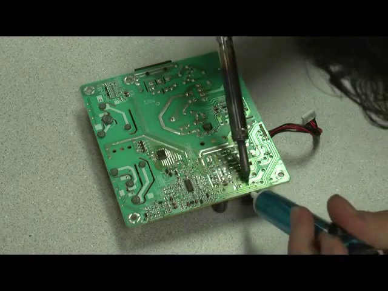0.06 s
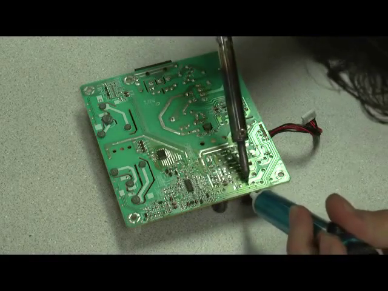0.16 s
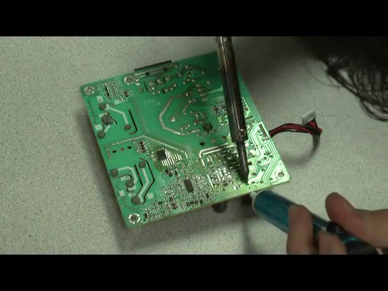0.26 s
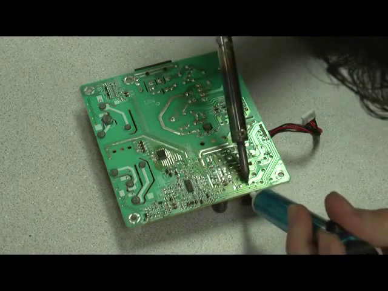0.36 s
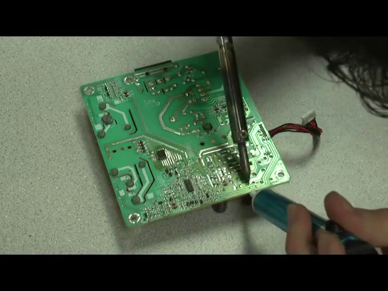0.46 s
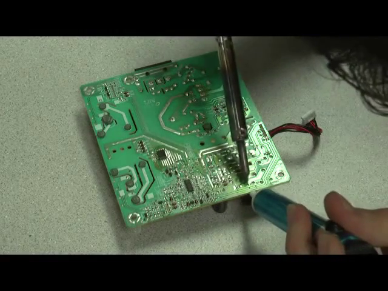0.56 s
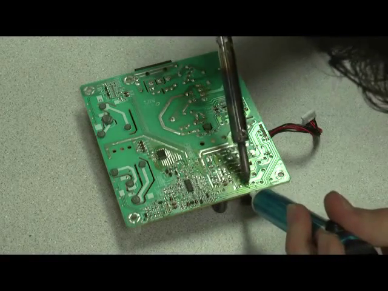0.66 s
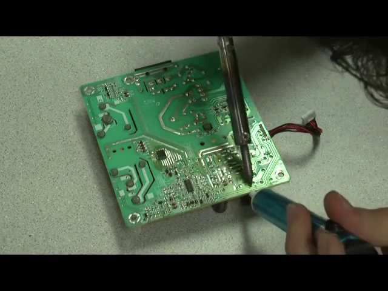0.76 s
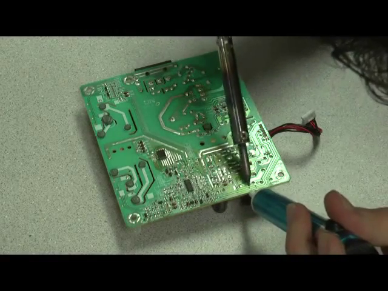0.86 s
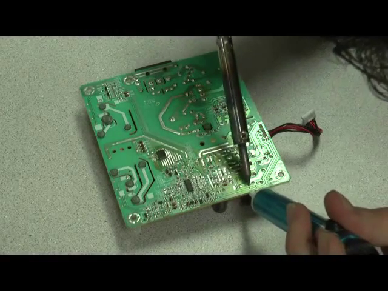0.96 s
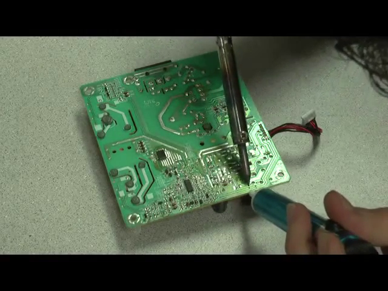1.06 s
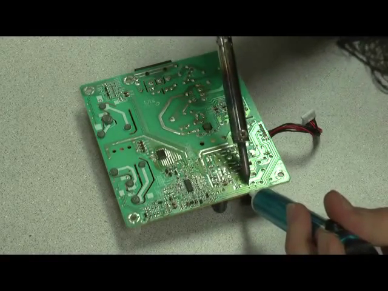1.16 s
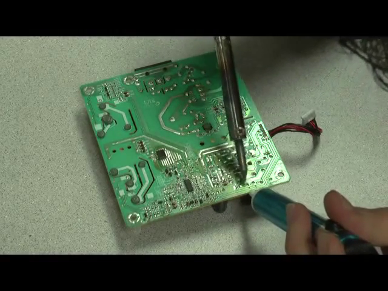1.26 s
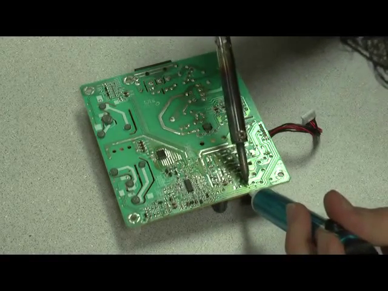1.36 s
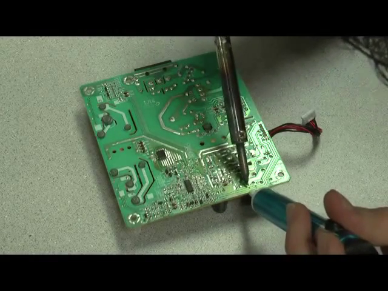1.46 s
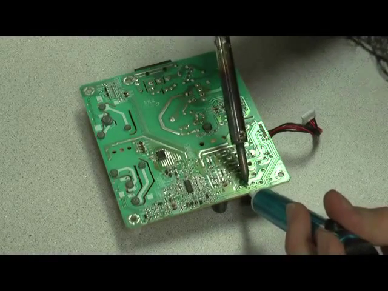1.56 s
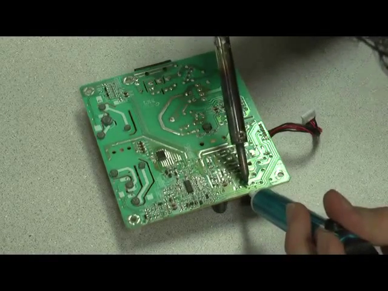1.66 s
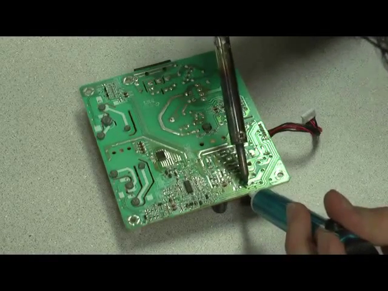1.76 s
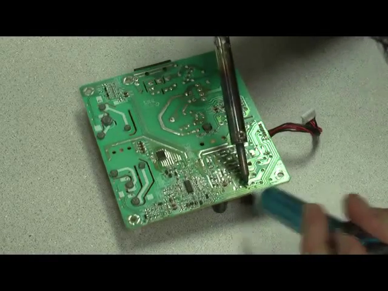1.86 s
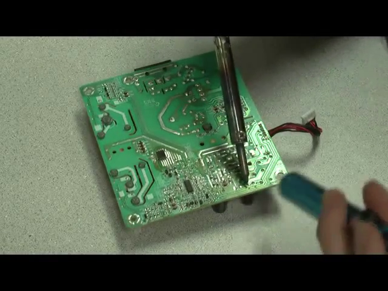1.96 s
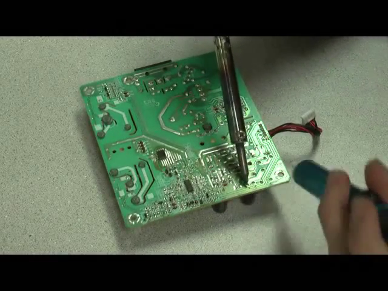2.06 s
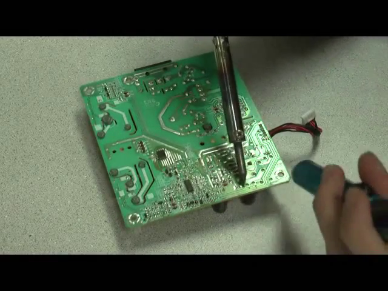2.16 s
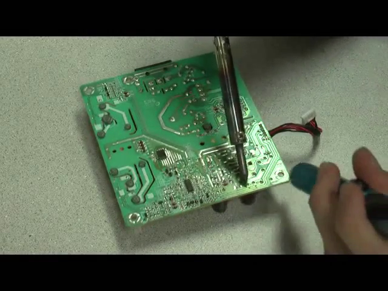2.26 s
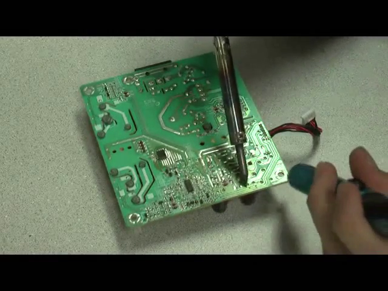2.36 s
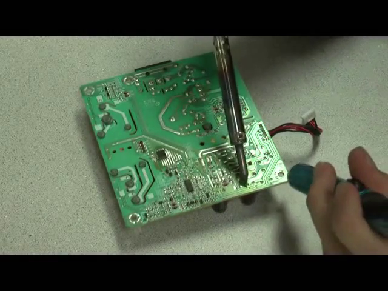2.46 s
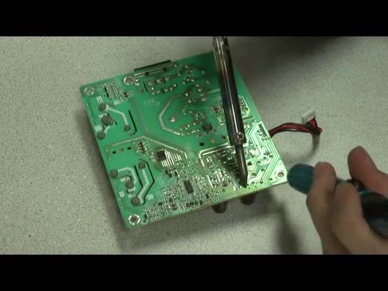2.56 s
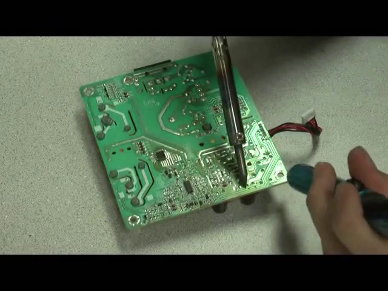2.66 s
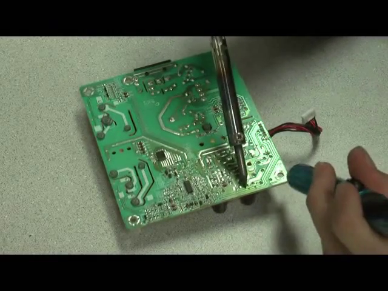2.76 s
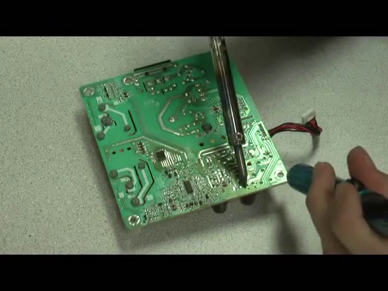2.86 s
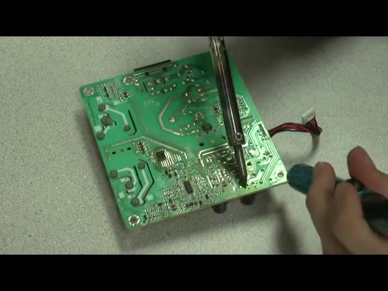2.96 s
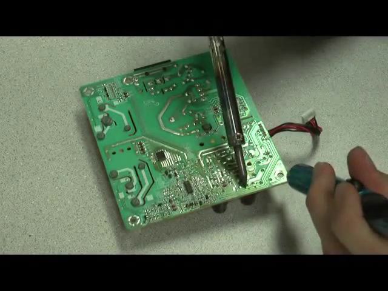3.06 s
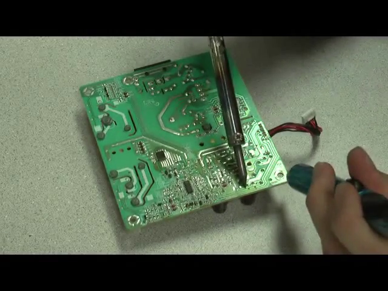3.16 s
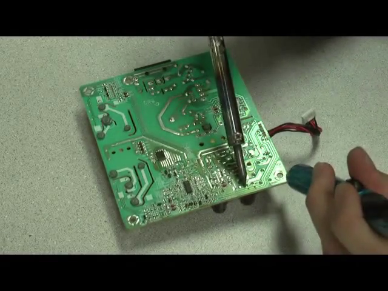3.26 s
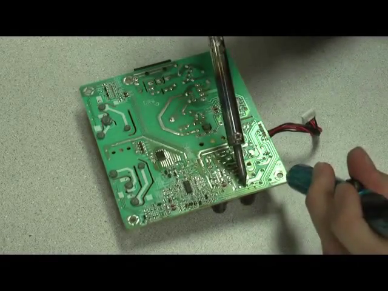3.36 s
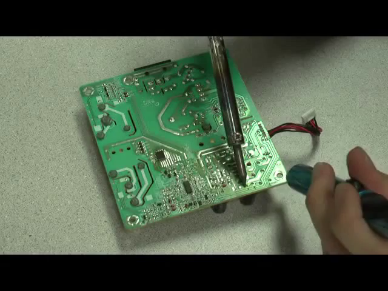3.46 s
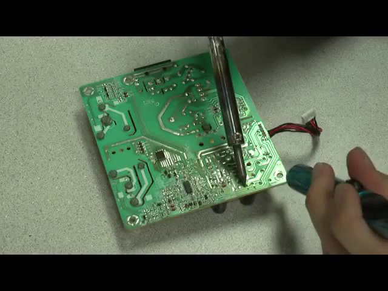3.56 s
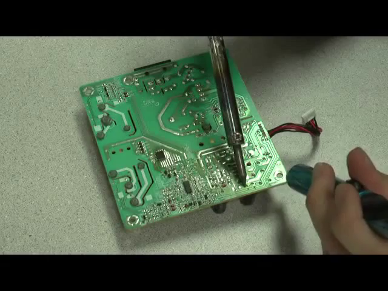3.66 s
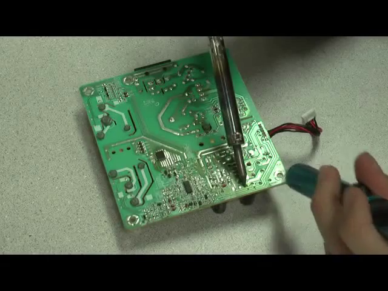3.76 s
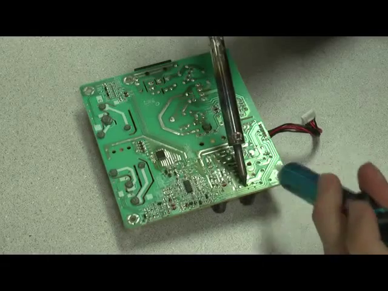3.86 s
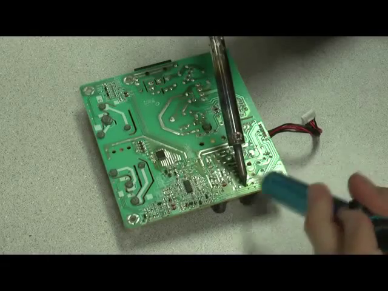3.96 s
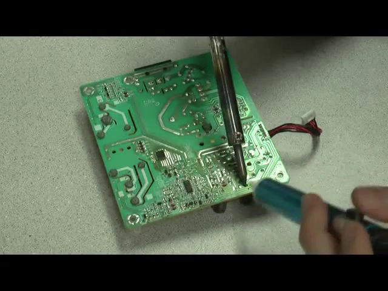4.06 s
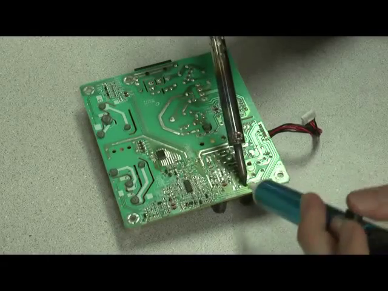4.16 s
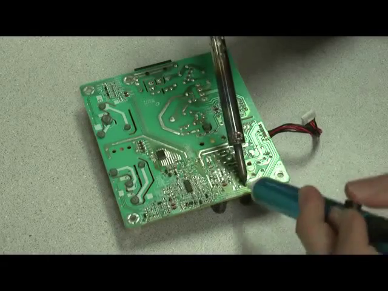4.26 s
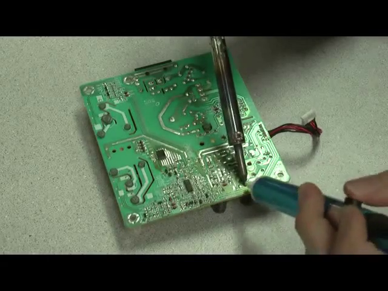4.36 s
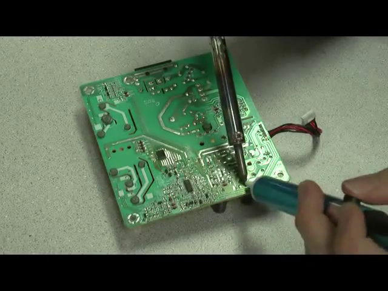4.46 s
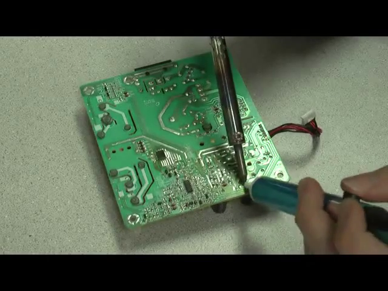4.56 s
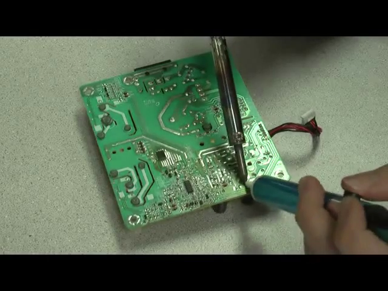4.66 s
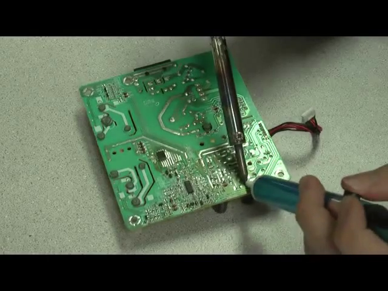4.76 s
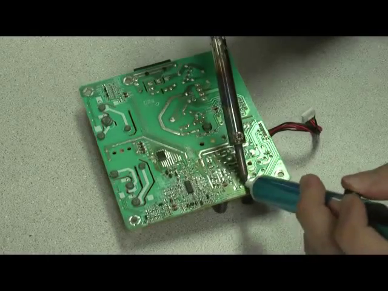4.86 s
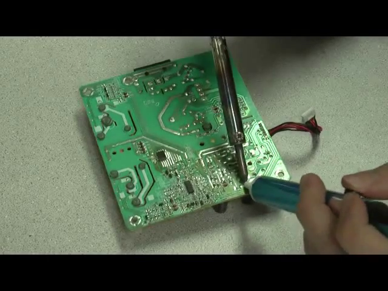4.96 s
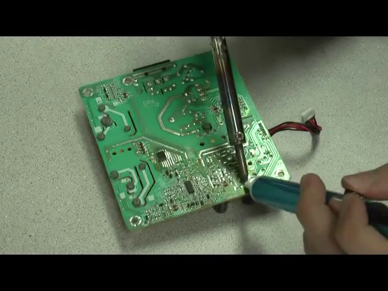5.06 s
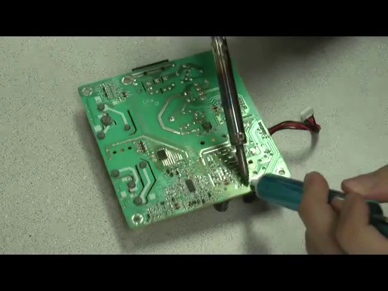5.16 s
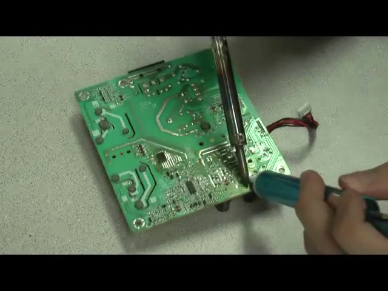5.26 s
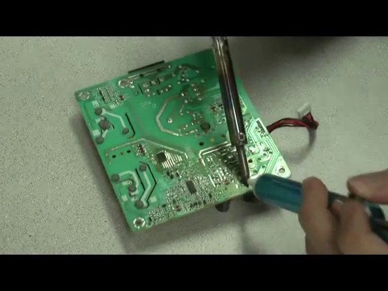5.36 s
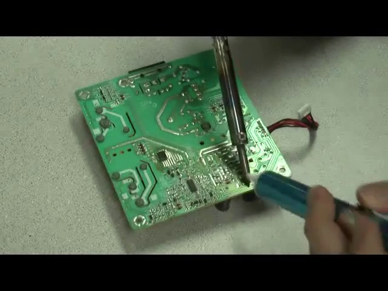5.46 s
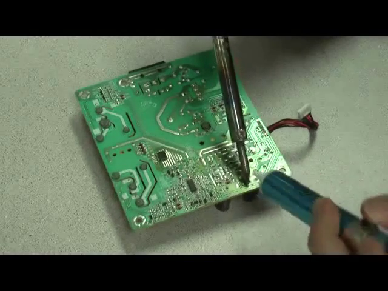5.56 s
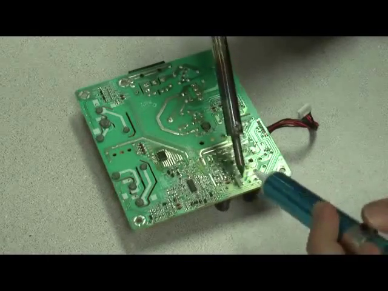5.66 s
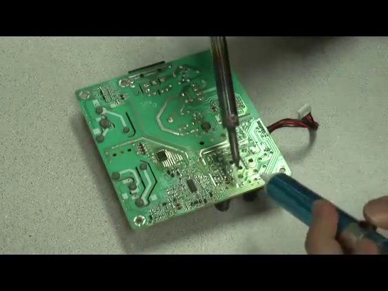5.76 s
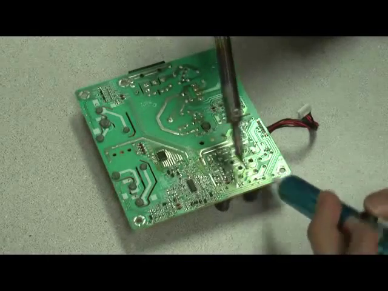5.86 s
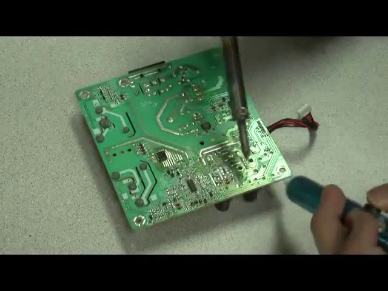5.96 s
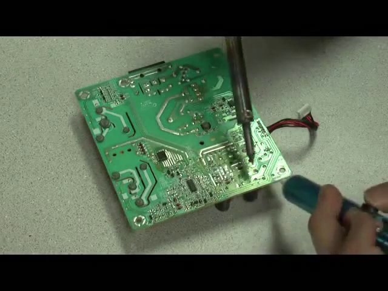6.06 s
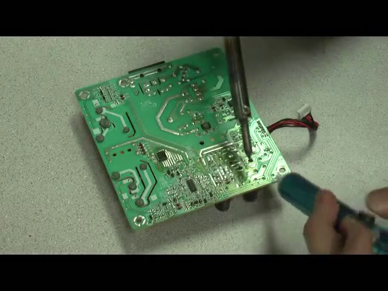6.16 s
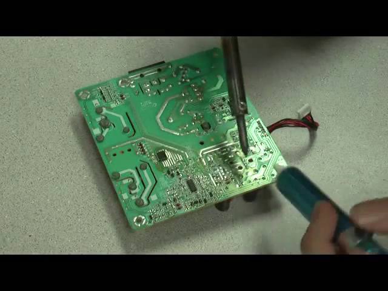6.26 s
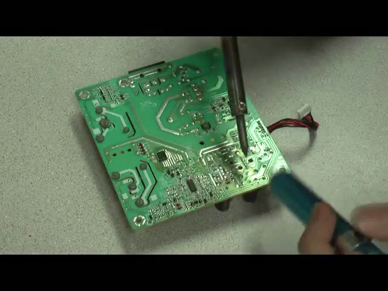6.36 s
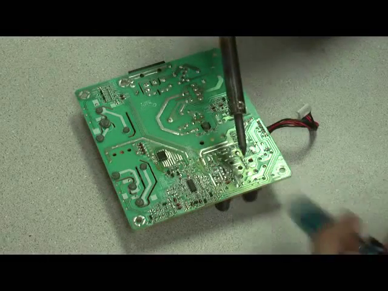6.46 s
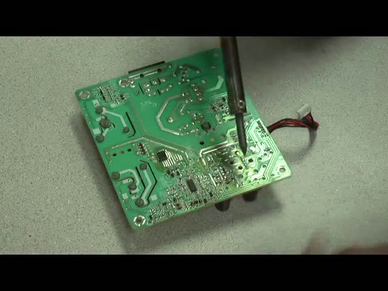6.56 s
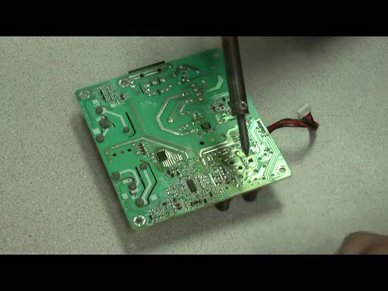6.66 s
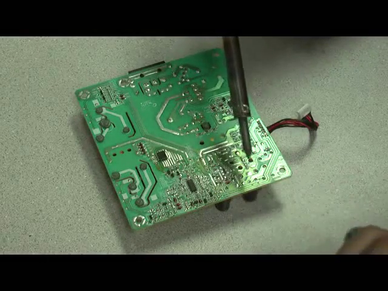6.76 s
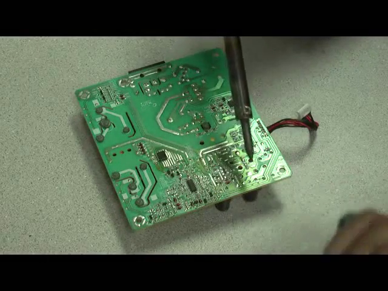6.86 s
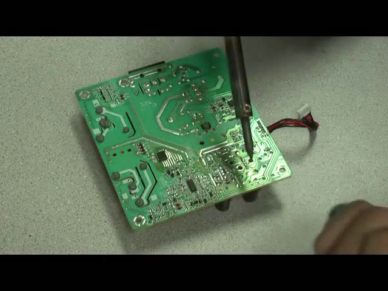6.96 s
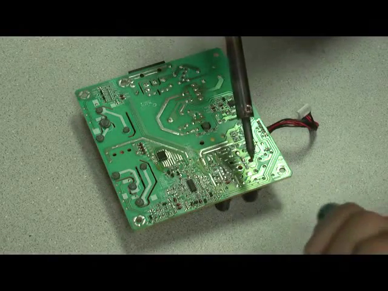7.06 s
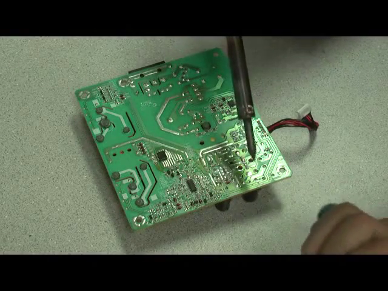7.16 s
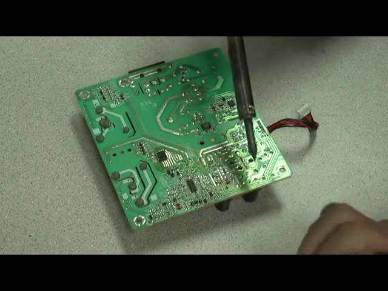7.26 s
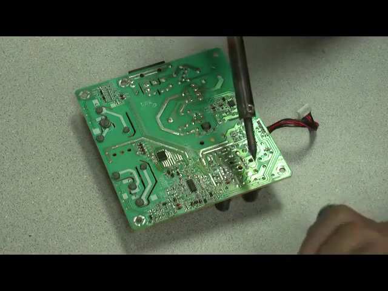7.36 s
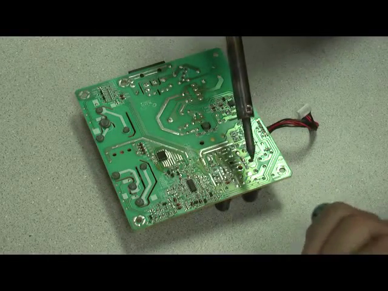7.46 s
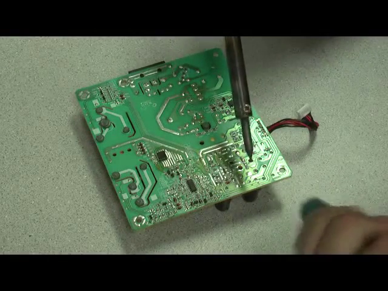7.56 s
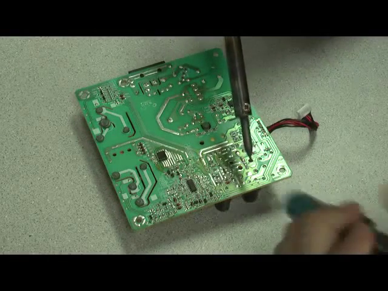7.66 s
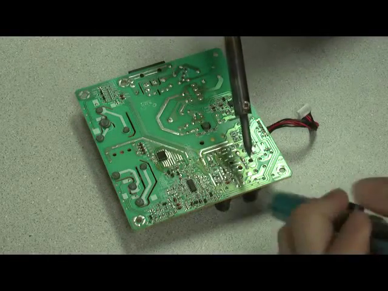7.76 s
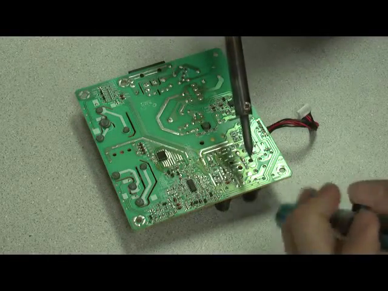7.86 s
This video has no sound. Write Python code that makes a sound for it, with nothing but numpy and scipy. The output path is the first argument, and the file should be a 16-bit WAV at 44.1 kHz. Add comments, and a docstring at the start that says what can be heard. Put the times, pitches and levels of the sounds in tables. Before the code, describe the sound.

A spring-loaded solder sucker taps a circuit board, fires with a sharp double snap, then is re-cocked with a loud click over low fan hum.

```python
"""Spring-loaded solder sucker in a workshop

A fan's low hum is filtered noise and narrow-band tones, with soft hiss and a thin whine.
Nozzle and iron tap a circuit board: short bursts of noise wake resonances. The piston is released, rushes
up the barrel and slams into its stop: whitened chatter is coloured, and barrel and spring modes ring.
The plunger is set on the bench and pressed, rubbing as friction noise, until it latches; its rod
springs back. Bench thuds are decaying sines. The recorder's gain ducks after the snaps.
"""
import sys
import numpy as np
from scipy import signal
from scipy.fft import rfft, irfft, next_fast_len
from scipy.io import wavfile
from scipy.ndimage import uniform_filter1d

SR = 44100
rng = np.random.default_rng(int(sys.argv[2]) if len(sys.argv) > 2 else 0)


def store_pcm(level_fs):
    """Save levels as 16-bit WAV."""
    pcm = np.round(np.clip(level_fs, -1, 1) * 32767).astype(np.int16)
    wavfile.write(sys.argv[1], SR, np.atleast_2d(pcm).T)


N = 348301
TIME = np.arange(N) / SR
SHORT = 8192   # length of a short sound or filter [samples]

# All levels below are those ahead of gain control and peak rounding.

# Fan rumble and hiss spectra: (frequency [Hz], density [dB per Hz])
RUMBLE_SPECTRUM = [(8, -40), (16, -18), (30, -27), (42, -15), (62, -9), (80, -2), (100, 0), (125, -3.5),
                   (185, -10), (215, -15), (300, -15), (390, -16), (680, -25), (850, -32), (1300, -55),
                   (2600, -110)]
HISS_SPECTRUM = [(500, -12), (800, 0), (1150, 0), (1700, -5.5), (2400, -7.5), (4000, -12.5), (5800, -14),
                 (7200, -19), (8800, -22), (9400, -17), (11400, -16.5), (12400, -24), (13000, -31),
                 (15500, -32)]
# Narrow bands of hum: (frequency [Hz], width [Hz], level [dB rms])
HUM_BANDS = [(94, 24, -51), (156, 8, -56), (302, 14, -53), (376.8, 10, -56), (446.8, 10, -58),
             (485, 14, -63), (608.3, 6, -65), (650, 14, -64), (1464, 15, -72), (2196, 15, -73)]
# Steady electronic whine: (frequency [Hz], level [dB rms])
WHINE = (5314, -69.5)
# Stereo width of the background and of the reflections: (frequency [Hz], side against mid [dB])
AIR_WIDTH = [(25, -31), (60, -45), (110, -45), (200, -33), (380, -25), (700, -14), (1290, -6), (2380, -4),
             (4400, -6), (8120, -6), (11000, -8), (13000, -18)]
ROOM_WIDTH = [(100, -30), (500, -11), (1200, -3), (5000, -4), (9000, -3), (14000, -14)]
# Reverberation of the room: (frequency [Hz], time to fall 60 dB [s])
ROOM_T60 = [(200, .3), (1000, .3), (3000, .29), (6000, .255), (11000, .245), (16000, .245)]

# Dull bumps against the bench:
# (time [s], thud level [dB], frequency [Hz], time to fall 60 dB [s], shudder of the bench top [dB])
BUMPS = [(5.3295, -18, 220, .035, -38), (5.3400, -17, 170, .035, -40), (6.6930, -36, 420, .04, -46),
         (6.7390, -20, 280, .08, -39), (6.7400, -26, 570, .075, -46), (6.8430, -22, 140, .07, -46),
         (6.8540, -21.5, 170, .07, -44)]
# Light contacts of nozzle and iron on the board, before the common lift in tap():
# (time [s], level [dB], main resonance [Hz], its strength [dB], brightness [dB per octave],
#  rebound against the first touch [dB], rebound resonance [Hz])
TAPS = [(0.3085, -45, 2200, 9, -5, -12, 2050), (0.9182, -41, 4100, 5, -1, 1.5, 2400),
        (1.0078, -42.5, 3950, 8, -1, 2, 2250), (1.5365, -45, 2550, 6, -1.5, -15, 2400),
        (2.4140, -56, 3800, 6, -1, -10, 2400), (3.3755, -36, 4400, -5, .7, -1.5, 1500),
        (6.6790, -44.5, 5500, 10, -3, -8, 1450), (6.6935, -41, 2150, 14, -2, -7, 4100)]
# Short scuffs and rattles: a slide on the board, a handling scuff, loose pump parts:
# (middle time [s], fade time either side [s], level [dB], resonance [Hz])
SCUFFS = [(3.941, .015, -42.5, 2400), (6.720, .018, -45, 2700), (7.085, .018, -53, 5800),
          (7.185, .025, -52, 5400)]
# Loose parts clicking as the pump is held in the hand, before the common lift in tap():
# (time [s], level [dB], resonance [Hz], its strength [dB], brightness [dB per octave])
CLICKS = [(5.5249, -37.5, 4900, 6, 0), (6.4548, -47.5, 5200, 8, -1), (7.0749, -47.5, 3100, 7, 0),
          (7.0810, -51, 6000, 8, 1), (7.1637, -35, 3400, 5, -3), (7.1981, -45.5, 3700, 0, 2),
          (7.3020, -52, 3000, 6, 0), (7.3490, -53, 6300, 8, 1), (7.3780, -52, 4000, 0, -1)]
# Hollow knocks as the nozzle comes off the board, before the common lift in knocks():
# (time [s], level [dB], resonance [Hz], width [Hz])
KNOCKS = [(5.4340, -41, 1700, 110), (5.4345, -43, 850, 400), (5.4420, -48, 1200, 200),
          (5.4475, -46, 780, 200)]
# Lesser strikes of piston and rod against the barrel:
# (time [s], level [dB], brightness [dB per octave])
BOUNCES = [(5.3228, -17.5, -1), (5.3333, -21.5, 2), (5.3475, -21.5, 5), (7.4020, -22, -2), (7.5905, -29, 2)]

# Hard blows: (time [s], level [dB], chatter decay [s], ring of the pump against the blow [dB],
#  room [dB], run-up [s], rasp level [dB], rasp brightness [dB per octave])
RELEASE = (5.3117, -12.5, .0014, -13, -2, .0034, -17.5, 0)
PISTON_STOP = (5.3391, -9.5, .0016, -12, -2.5, .007, -21.5, 3)
BENCH_KNOCK = (6.7390, -20, .0090, -22, -2, .004, -46, 0)
LATCH = (7.3942, -10.2, .0012, -9.5, -2.5, .003, -24.5, 3)
ROD_STOP = (7.5787, -13.2, .0012, -20, -7.5, .016, -29, 2.5)

# Spectra of blows, touches, rubbing and bench top: (frequency [Hz], density [dB per Hz])
RELEASE_COLOUR = [(200, -14), (600, -19), (1150, -16), (1700, -7), (2500, -13), (3300, -8), (4200, 0),
                  (5100, 0), (6000, -2), (6800, -8), (8300, -21), (9300, -12), (11200, -10), (12400, -23),
                  (15500, -24)]
STOP_COLOUR = [(200, -13), (520, -10), (820, -13), (1120, -6), (1450, -9), (2250, -4), (3500, -10),
               (4400, -8), (5100, -9), (5700, 2), (6500, -1), (8100, -21), (9300, -9), (11400, -8),
               (12500, -27), (15500, -26)]
KNOCK_COLOUR = [(120, -4), (280, 0), (420, -6), (580, -3), (760, -15), (1700, -20), (3600, -22),
                (5000, -21), (6300, -20), (8000, -33), (11000, -31), (12400, -44), (15000, -46)]
LATCH_COLOUR = [(200, -11), (700, -13), (1000, -12), (1330, -5), (1600, -19), (2000, -1), (2350, 0),
                (2700, -6), (3200, 0), (4300, -3), (5200, -3), (5850, -10), (6500, -3), (7900, -17),
                (8800, -13), (11100, -20), (12400, -30), (15500, -36)]
ROD_COLOUR = [(180, -41), (300, -11), (1160, -7), (1620, -20), (2400, -9), (2690, -17), (2980, -6),
              (3810, -9), (4490, 0), (5760, -4), (7880, -20), (11000, -19), (15500, -32)]
TAP_COLOUR = [(300, -20), (800, -10), (1200, 0), (1700, -3), (2450, 1), (3100, -12), (3800, -3), (4400, -2),
              (5400, -9), (6500, -10), (8400, -18), (9600, -12), (11300, -14), (12400, -28), (15500, -28)]
CLICK_COLOUR = [(400, -16), (1200, -10), (2500, -9), (3000, 0), (3900, 0), (4600, -5), (6100, -6),
                (8300, -17), (10600, -10), (12400, -22), (15500, -24)]
RUB_COLOUR = [(400, -2), (1200, -1), (2800, 0), (4000, -6), (6500, -7), (8200, -17), (11000, -12),
              (15000, -32)]
BENCH_COLOUR = [(120, -3), (270, -1), (420, -3), (560, 0), (760, -13), (1500, -30), (4000, -60)]

# Barrel and spring, with the spring slack and compressed:
# (frequency [Hz], width before the damping factor [Hz], relative level [dB])
SLACK_MODES = [(3040, 30, -2), (3847, 25, -2), (3973, 25, -5), (4150, 25, -1), (4430, 25, -3),
               (4864, 25, 0), (4982, 30, -3), (5423, 22, -2), (5497, 20, 0), (5850, 18, -2), (5964, 18, -4),
               (6322, 24, -2), (6590, 20, -3), (9420, 25, 1)]
COCKED_MODES = [(2061, 30, -2), (2100, 20, -2), (3000, 28, -6), (3390, 20, -6), (4210, 20, -4),
                (4305, 14, -3), (4900, 20, -6), (5195, 16, -3), (6468, 13, 7), (7610, 18, 0), (8893, 18, 0),
                (9220, 13, 4)]
# The circuit board under a hard kick: (frequency [Hz], starting level [dB], time to fall 60 dB [s])
BOARD_MODES = [(571, -19.5, .024), (1170, -18, .02), (1810, -29, .03), (2250, -22.5, .03)]
# The plastic shell, hit by the catch: (frequency [Hz], starting level [dB], time to fall 60 dB [s])
SHELL_MODES = [(1290, -23, .03), (2090, -17, .03), (2380, -14.5, .011), (3150, -15.5, .014)]

RUMBLE_START_DB, RUMBLE_RISE_DB_PER_S = -39.6, .3
SHUDDER_T60_S = .17
# A rebound follows the touch closely and is duller.
REBOUND_S, REBOUND_DULLER_DB_PER_OCTAVE = .0018, 1.5
PRESS_START_S, PRESS_END_S, PRESS_FADE_S, PRESS_DB = 6.77, 7.42, .06, -55.8
# Treble gain of the rub, matched by an opposite bass gain.
PRESS_SLACK_TREBLE_DB, PRESS_TIGHT_TREBLE_DB = -5, 3
# A swelling, duller rasp leads in each blow; a short fading rattle follows it.
RUN_UP_SWELL_DB, RUN_UP_DULLER_DB_PER_OCTAVE = 11, 3
RATTLE_S, RATTLE_FADE_DB = .014, 3
SLIDE_DB = -28.5   # the piston's slide from release to stop
CATCH_DELAY_S = .0005   # from latch to the catch's clack
CUTOFF_HZ = 15900


def from_db(db):
    """Level in decibels to amplitude ratio."""
    return 10 ** (np.asarray(db) / 20)


def rms_one(x):
    """Normalise to unit effective value."""
    return x / np.sqrt(np.mean(x ** 2) + 1e-20)


def energy_one(x):
    """Normalise to unit energy."""
    return x / np.sqrt(np.sum(x ** 2) + 1e-20)


def at_level(sound, db):
    """Scale an impulse so that its energy, spread over 2 ms, has this level."""
    return from_db(db) * np.sqrt(SR / 500) * energy_one(sound)


def at_hz(points, hz):
    """Interpolate a spectrum linearly over log frequency."""
    f, value = np.transpose(points)
    return np.interp(np.log(np.maximum(hz, 1)), np.log(f), value)


def colour(x, spectrum, tilt_db=0):
    """Causal minimum-phase filter, found by folding the cepstrum of the wanted spectrum."""
    size = SHORT if len(x) > SR else SHORT // 4
    lowest = spectrum[0][0]
    hz = np.maximum(np.fft.rfftfreq(size, 1 / SR), lowest / 10)
    octaves_below = np.minimum(np.log2(hz / lowest), 0)
    # the tilt pivots at 3 kHz and is flat below 1 kHz
    tilt = tilt_db * np.log2(np.maximum(hz, 1000) / 3000)
    db = at_hz(spectrum, hz) + 12 * octaves_below + tilt
    cepstrum = irfft(np.log(from_db(db)))
    cepstrum[1:size // 2] *= 2
    cepstrum[size // 2 + 1:] = 0
    impulse_response = irfft(np.exp(rfft(cepstrum)))
    return signal.oaconvolve(x, impulse_response)[:len(x)]


def resonate(x, hz, width):
    """Second-order resonator: a pole pair whose radius sets the bandwidth; unit gain at the peak."""
    r = np.exp(-np.pi * width / SR)
    zeros = np.array([1, 0, -1]) * (1 - r * r) / 2
    poles = [1, -2 * r * np.cos(2 * np.pi * hz / SR), r * r]
    return signal.lfilter(zeros, poles, x + 1e-18)   # the offset avoids vanishingly small numbers


def add(track, s, sound):
    """Superpose a sound on a track from time s."""
    start = int(round(s * SR))
    part = sound[..., :N - start]
    track[..., start:start + part.shape[-1]] += part


def stereo_noise(size, width):
    """Partly coherent noise: left and right are the sum and difference of mid and side."""
    mid, side = rng.standard_normal((2, size))
    side = colour(side, width)
    return np.array([mid + side, mid - side])


def room_response(early_s=.011, early_db=1.0, gap_s=.0022):
    """Diffuse reverberation: dense early reflections off bench and tools, then a tail dying sooner in treble."""
    t = TIME[:2 * SHORT]
    noise = rfft(stereo_noise(len(t), ROOM_WIDTH))
    hz = np.fft.rfftfreq(len(t), 1 / SR)
    early = from_db(early_db) * np.exp(-t / early_s)
    out = 0
    for k, (_, t60) in enumerate(ROOM_T60):
        # overlapping bands whose shares add up to one
        band = [(f, float(j == k)) for j, (f, _) in enumerate(ROOM_T60)]
        band_noise = irfft(noise * at_hz(band, hz), len(t))
        out = out + band_noise * (from_db(-60 * t / t60) + early)
    return np.sqrt(2) * energy_one(out * (t > gap_s))


def in_room(sound, room, room_db, pan_db):
    """Direct sound with a level difference of left over right, plus its reflections by convolution."""
    out = from_db(room_db) * signal.oaconvolve(sound[None], room, axes=1)
    out[:, :len(sound)] += sound * from_db([[pan_db / 2], [-pan_db / 2]])
    return out


def wavering_tone(hz, width):
    """Narrow-band noise: random lines near one frequency beat, so strength and phase wander; rms 1."""
    size = next_fast_len(N, real=True)
    offset = (np.fft.rfftfreq(size, 1 / SR) - hz) / width
    near = np.flatnonzero(abs(offset) < 5)
    draws = rng.standard_normal((2, SHORT))[:, near % SHORT]
    lines = np.zeros(len(offset), complex)
    lines[near] = (draws[0] + 1j * draws[1]) / (1 + offset[near] ** 2)
    return rms_one(irfft(lines, size)[:N])


def air_noise(spectrum):
    """Broadband stereo noise shaped by a spectrum; rms 1."""
    return rms_one(np.array([colour(side, spectrum) for side in stereo_noise(N, AIR_WIDTH)]))


def workshop(hiss_db=-54.2):
    """Background sources: slowly swelling fan rumble, narrow humming resonances, a thin whine and hiss."""
    rumble = air_noise(RUMBLE_SPECTRUM) * from_db(RUMBLE_START_DB + RUMBLE_RISE_DB_PER_S * TIME)
    hiss = from_db(hiss_db) * air_noise(HISS_SPECTRUM)
    hum = sum(from_db(db) * wavering_tone(hz, width) for hz, width, db in HUM_BANDS)
    whine_hz, whine_db = WHINE
    whine = from_db(whine_db) * rms_one(np.sin(2 * np.pi * whine_hz * TIME))
    return rumble + hiss + hum + whine


def bumps(rise_s=.002):
    """Damped vibration: soft pushes make the bench top thud at one frequency and shudder as noise."""
    out, t = np.zeros(N), TIME[:SHORT]
    for s, db, hz, t60, shudder_db in BUMPS:
        thud = from_db(db - 60 * t / t60) * np.sin(2 * np.pi * hz * t)
        bench_noise = rms_one(colour(rng.standard_normal(SHORT), BENCH_COLOUR))
        shudder = from_db(shudder_db - 60 * t / SHUDDER_T60_S) * bench_noise
        add(out, s, (1 - np.exp(-t / rise_s)) * (thud + shudder))
    return out


def friction(size, grain_db):
    """Stick-slip noise: dense tiny slips of uneven strength."""
    strength = from_db(grain_db * np.minimum(rng.exponential(1, size), 5))
    return rms_one(rng.standard_normal(size) * strength)


def scuffs(room, resonance_db=6, resonance_width=500):
    """Noise excitation: each short scuff or rattle swells and fades, shaking one main resonance."""
    out, t = np.zeros((2, N)), TIME[:SHORT] - TIME[SHORT // 2]
    for s, fade_s, db, hz in SCUFFS:
        scuff = colour(friction(len(t), grain_db=3), TAP_COLOUR)
        scuff = rms_one(scuff + from_db(resonance_db) * resonate(scuff, hz, resonance_width))
        scuff = scuff * from_db(db) * np.exp(-abs(t) / fade_s)
        add(out, s + t[0], in_room(scuff, room, room_db=-3.5, pan_db=-.3))
    return out


def contact(decay):
    """Impact excitation: a click and the fast-dying chatter of settling parts; even spectrum, energy 1."""
    t = TIME[:SHORT // 2]
    chatter = rng.standard_normal(len(t)) * np.exp(-np.minimum(t / decay, 20))
    burst = energy_one(chatter)
    burst[0] += .22
    power = uniform_filter1d(abs(rfft(burst)) ** 2, size=30)
    hz = np.fft.rfftfreq(len(burst), 1 / SR)
    whitening = np.c_[hz + 1, -10 * np.log10(power)]
    return energy_one(colour(burst, whitening))


def tap(db, spectrum, hz, width, resonance_db, tilt_db, level_db=7):
    """Impact and resonance: a light touch wakes one mode of the board or barrel above a broad tick."""
    tick = colour(contact(decay=.002), spectrum, tilt_db)
    return at_level(tick + from_db(resonance_db) * resonate(tick, hz, width), db + level_db)


def taps(room, resonance_width=430, rebound_width=550, rebound_ring_db=14, echo_s=.008, echo_db=-11):
    """Repeated impact: each light contact is a touch and its rebound; a nearby surface echoes the touch."""
    out = np.zeros(N)
    for s, db, hz, resonance_db, tilt_db, rebound_db, rebound_hz in TAPS:
        touch = tap(db, TAP_COLOUR, hz, resonance_width, resonance_db, tilt_db)
        rebound_tilt_db = tilt_db - REBOUND_DULLER_DB_PER_OCTAVE
        rebound = tap(db + rebound_db, TAP_COLOUR, rebound_hz, rebound_width,
                      rebound_ring_db, rebound_tilt_db)
        add(out, s, touch)
        add(out, s + echo_s, from_db(echo_db) * touch)
        add(out, s + REBOUND_S, rebound)
    return in_room(out, room, room_db=-6.5, pan_db=-.3)[:, :N]


def knocks(room, level_db=7):
    """Resonant filtering: soft contacts ring one round resonance each, with no tick."""
    out = np.zeros(N)
    for s, db, hz, width in KNOCKS:
        ringing = resonate(contact(decay=.001), hz, width)
        rounded = resonate(ringing, hz, hz)   # a second, very broad resonance
        add(out, s, at_level(rounded, db + level_db))
    return in_room(out, room, room_db=-5, pan_db=-.3)[:, :N]


def clicks(room, resonance_width=330):
    """Impact inside an enclosure: rod and spring clack in the plastic barrel."""
    out = np.zeros(N)
    for s, db, hz, resonance_db, tilt_db in CLICKS:
        add(out, s, tap(db, CLICK_COLOUR, hz, resonance_width, resonance_db, tilt_db))
    return in_room(out, room, room_db=-4, pan_db=-.7)[:, :N]


def plunger(room, dull_hz=3000, stick_db=2.3):
    """Stick-slip under rising load: pressed evenly, the seal rubs faintly, brighter as the spring tightens."""
    length = PRESS_END_S - PRESS_START_S
    t = TIME[:int(length * SR)]
    slips = from_db(stick_db * rms_one(uniform_filter1d(rng.standard_normal(2 * SR), size=400)))
    rub = rms_one(colour(friction(2 * SR, grain_db=5.5) * slips, RUB_COLOUR))[:len(t)]
    dull = signal.sosfilt(signal.butter(1, dull_hz, fs=SR, output="sos"), rub)
    treble_gain = from_db(np.interp(t, [0, length], [PRESS_SLACK_TREBLE_DB, PRESS_TIGHT_TREBLE_DB]))
    brightening = dull / treble_gain + (rub - dull) * treble_gain
    force = from_db(PRESS_DB) * np.minimum(np.minimum(t, length - t) / PRESS_FADE_S, 1)
    out = np.zeros((2, N))
    add(out, PRESS_START_S, in_room(force * brightening, room, room_db=-3, pan_db=-.3))
    return out


def pump_ring(sound, modes, damping=.8):
    """Modal superposition: barrel and spring ring on after whatever shakes them; energy 1."""
    ring = 0
    for k, (hz, width, db) in enumerate(modes):
        sign = (-1) ** k
        ring = ring + sign * from_db(db) * resonate(sound, hz, damping * width)
    return energy_one(ring)


def with_ring(sound, ring_db):
    """Sympathetic ringing: a lesser strike or rub, with the ring of the pump that it wakes."""
    return sound + from_db(ring_db) * np.linalg.norm(sound) * pump_ring(sound, SLACK_MODES)


def rasp(room, length, db, change_db, tilt_db):
    """Sliding friction: driven by the spring, piston or rod rasps along the barrel, swelling or fading."""
    travel = np.minimum(TIME[:SHORT] / length, 1)
    ends = np.clip(10 * np.minimum(travel, 1 - travel), 0, 1)   # short fade at each end
    force = from_db(db + change_db * travel) * ends
    rub = force * rms_one(colour(friction(SHORT, grain_db=3), RELEASE_COLOUR, tilt_db))
    return in_room(with_ring(rub, ring_db=-16), room, room_db=-4, pan_db=-1.8)


def runs(room):
    """Friction around impact: the piston slides to its stop; parts run up to each blow and rattle after it."""
    out = np.zeros((2, N))
    slide_s = PISTON_STOP[0] - RELEASE[0]
    add(out, RELEASE[0], rasp(room, slide_s, SLIDE_DB, change_db=0, tilt_db=0))
    for s, *_, run_up_s, db, tilt_db in (RELEASE, PISTON_STOP, BENCH_KNOCK, LATCH, ROD_STOP):
        run_up = rasp(room, run_up_s, db - RUN_UP_SWELL_DB, RUN_UP_SWELL_DB,
                      tilt_db - RUN_UP_DULLER_DB_PER_OCTAVE)
        add(out, s - run_up_s, run_up)
        add(out, s, rasp(room, RATTLE_S, db, -RATTLE_FADE_DB, tilt_db))
    return out


def bounces(room, decay=.0008):
    """Secondary impact: piston and rod strike the barrel again between and after the main blows."""
    out = np.zeros(N)
    for s, db, tilt_db in BOUNCES:
        add(out, s, at_level(colour(contact(decay), RELEASE_COLOUR, tilt_db), db))
    return in_room(with_ring(out, ring_db=-12), room, room_db=-5, pan_db=-1.7)[:, :N]


def struck(modes):
    """Free vibration: a body's modes, all set ringing by one hard push, decay exponentially."""
    t = TIME[:SHORT]
    return sum(from_db(db - 60 * t / t60) * np.sin(2 * np.pi * hz * t) for hz, db, t60 in modes)


def recoil(room):
    """Reaction: the stopping piston kicks nozzle against board; the catch, dropping home, clacks on the shell."""
    out = np.zeros(N)
    add(out, PISTON_STOP[0], struck(BOARD_MODES))
    add(out, LATCH[0] + CATCH_DELAY_S, struck(SHELL_MODES))
    return in_room(out, room, room_db=-6, pan_db=-1.5)[:, :N]


def blows(ring_room_db=-7):
    """Impact and modal response: release, piston stop, plunger set on the bench, latch, rod stop."""
    out = np.zeros((2, N))
    cycle = [(RELEASE, RELEASE_COLOUR, SLACK_MODES),
             (PISTON_STOP, STOP_COLOUR, SLACK_MODES),
             (BENCH_KNOCK, KNOCK_COLOUR, SLACK_MODES),
             (LATCH, LATCH_COLOUR, COCKED_MODES),
             (ROD_STOP, ROD_COLOUR, COCKED_MODES)]
    for (s, db, decay, ring_db, room_db, *_), spectrum, modes in cycle:
        blow = at_level(colour(contact(decay), spectrum), db)
        push = colour(signal.unit_impulse(SHORT), spectrum)
        ring = at_level(pump_ring(push, modes), db + ring_db)
        # each blow gets its own randomly drawn reflections
        room = room_response()
        add(out, s, in_room(blow, room, room_db, pan_db=-1.9))
        add(out, s, in_room(ring, room, ring_room_db, pan_db=-.8))
    return out


def scene():
    """Linear superposition of the background, the light contacts and the pump."""
    room = room_response()
    background = workshop() + bumps()
    light_contacts = scuffs(room) + taps(room) + knocks(room) + clicks(room)
    pump = plunger(room) + runs(room) + bounces(room) + recoil(room) + blows()
    return background + light_contacts + pump


def gain_control(x, threshold_db=-14, slope=.19, release_db_per_s=1.0, attack_s=.012):
    """Dynamic compression: loud peaks turn the gain down; it creeps back over seconds."""
    peak_db = 20 * np.log10(abs(x).max(axis=0) + 1e-9)
    over = slope * np.maximum(peak_db - threshold_db, 0)
    recovery = release_db_per_s * TIME
    held = np.maximum.accumulate(over + recovery) - recovery
    r = np.exp(-1 / (attack_s * SR))
    reduction_db = signal.lfilter([1 - r], [1, -r], held)
    return x * from_db(-reduction_db)


def record(dry):
    """Nonlinear and band-limited transfer: gain control, rounded peaks, and the top is cut."""
    rounded = np.tanh(gain_control(dry))
    return signal.sosfilt(signal.ellip(10, .1, 80, CUTOFF_HZ, fs=SR, output="sos"), rounded)


dry = scene()
out = record(dry)
store_pcm(out)
```